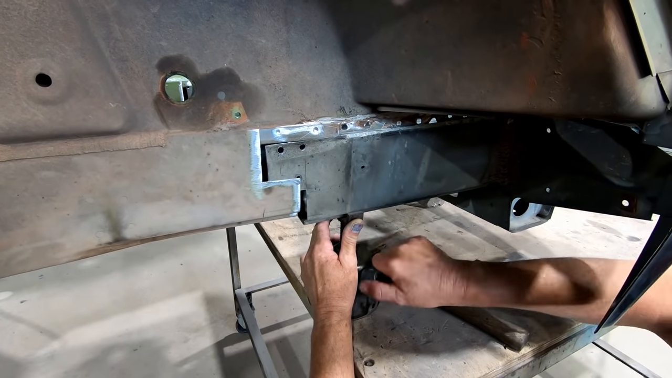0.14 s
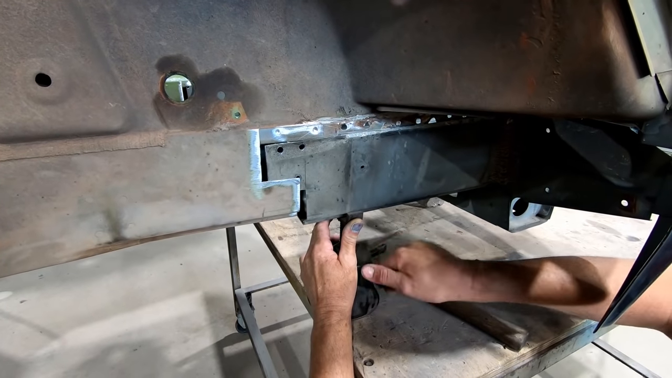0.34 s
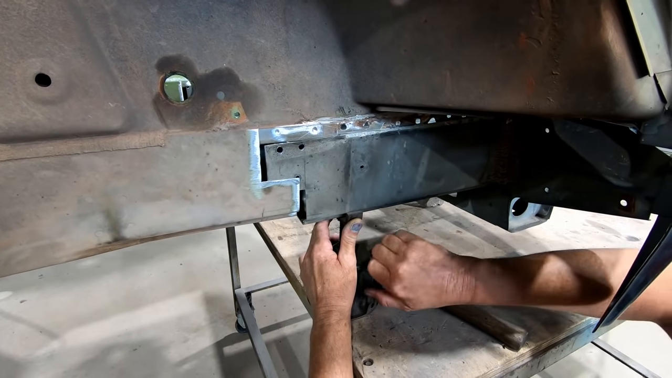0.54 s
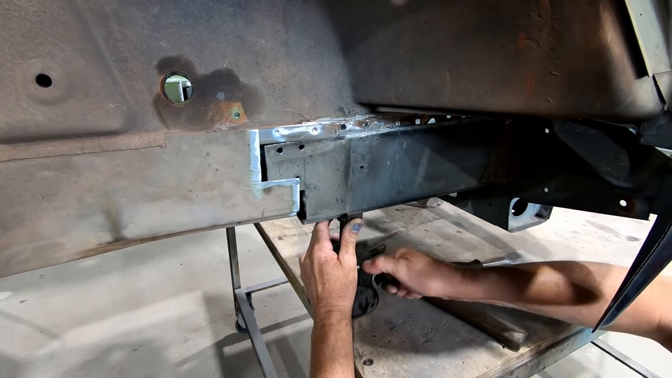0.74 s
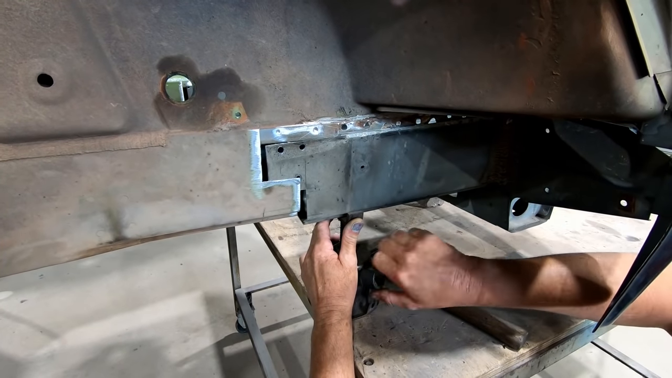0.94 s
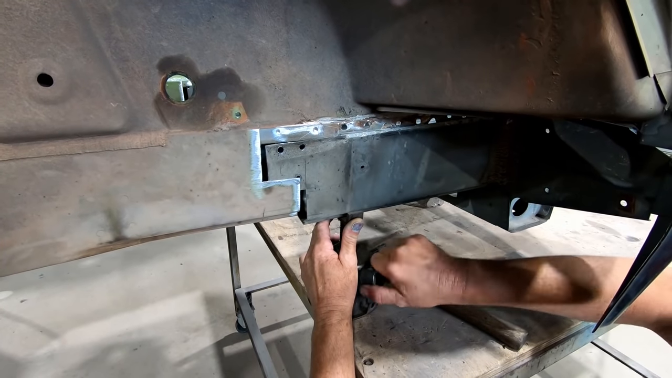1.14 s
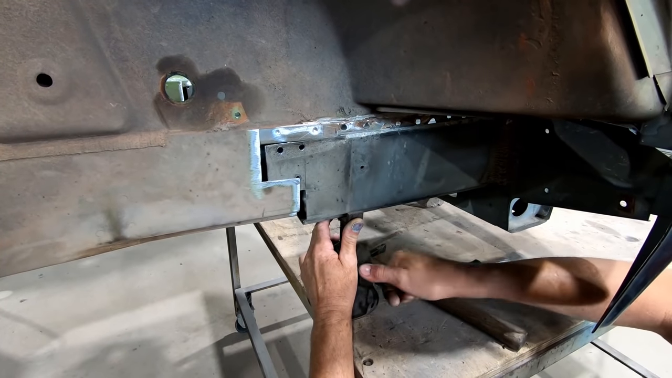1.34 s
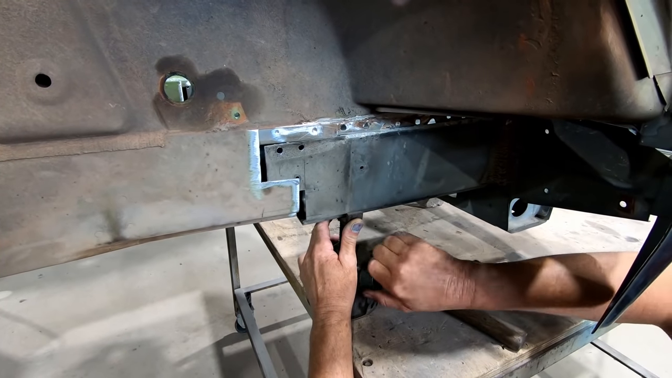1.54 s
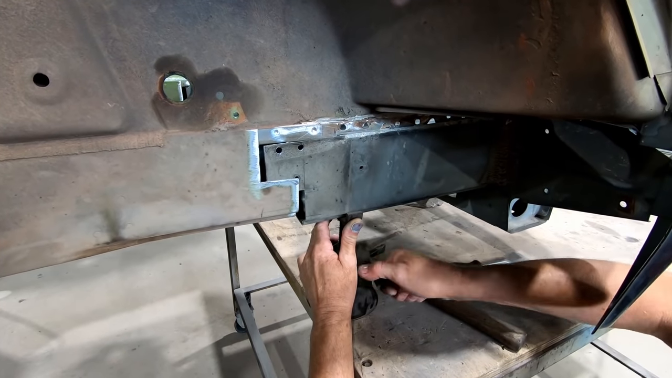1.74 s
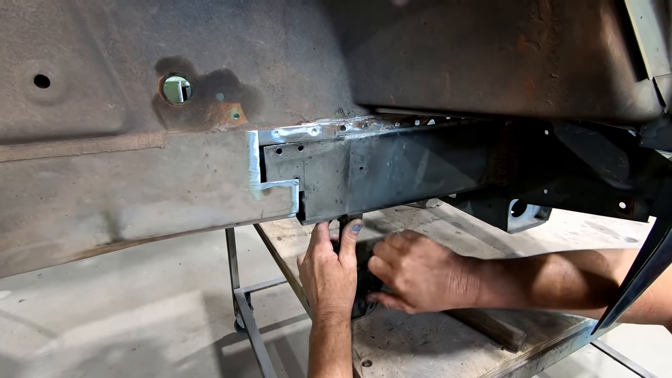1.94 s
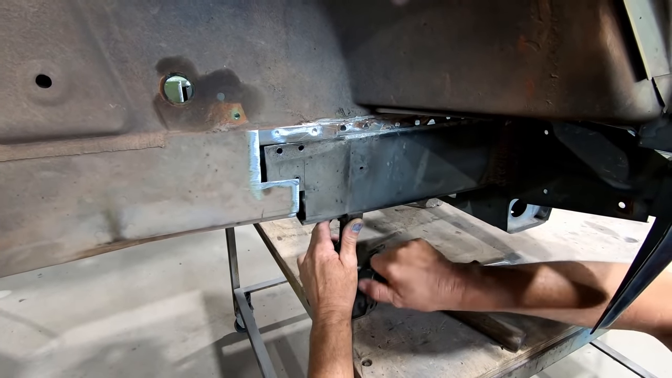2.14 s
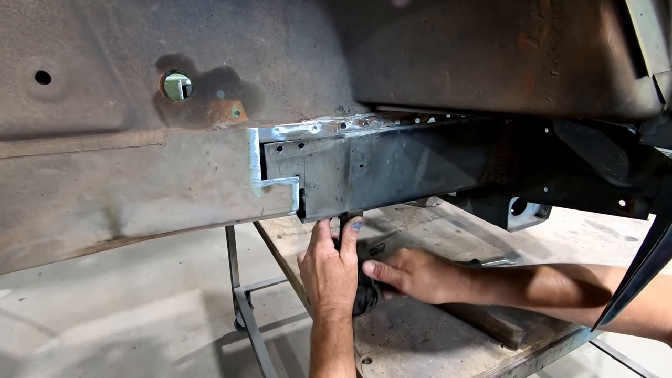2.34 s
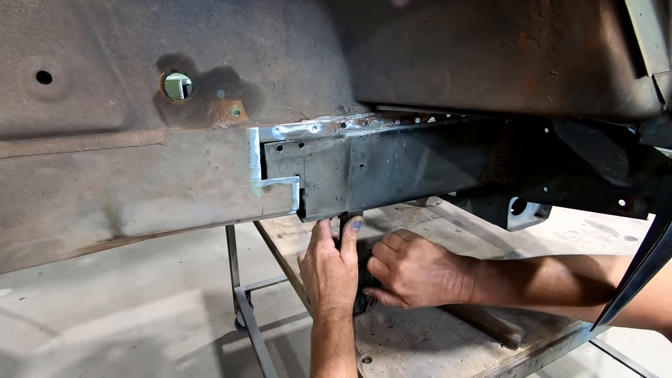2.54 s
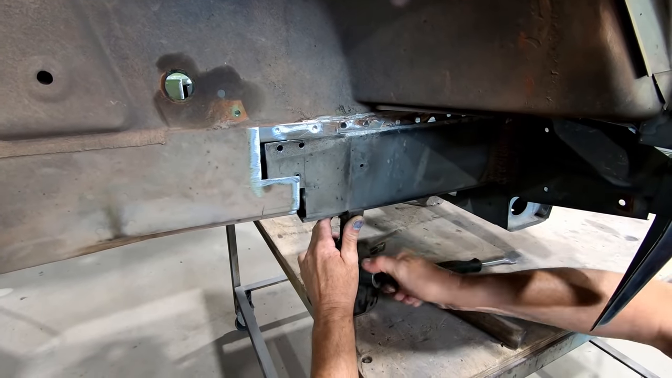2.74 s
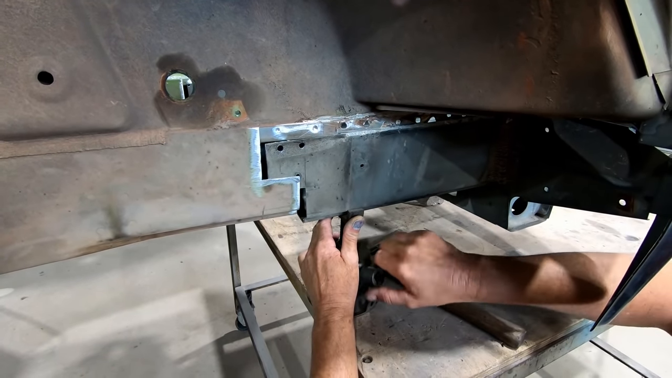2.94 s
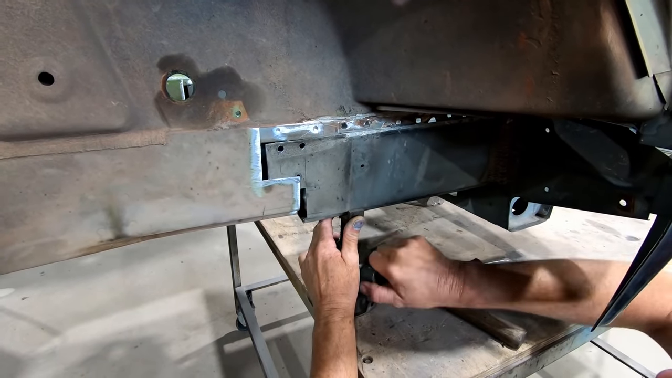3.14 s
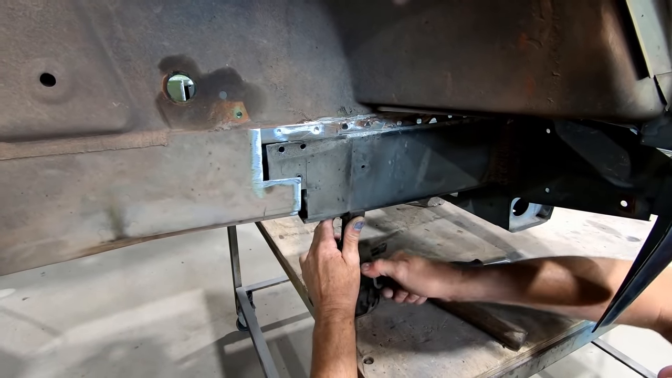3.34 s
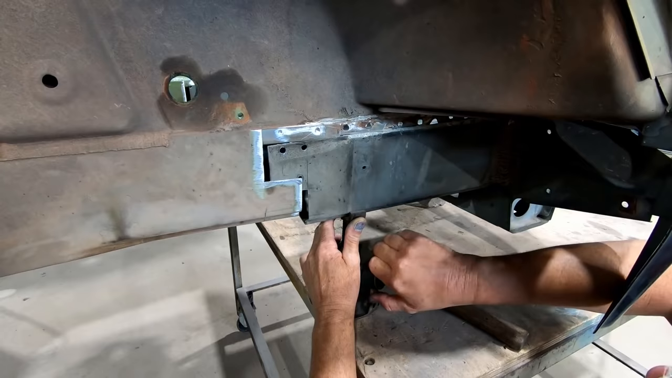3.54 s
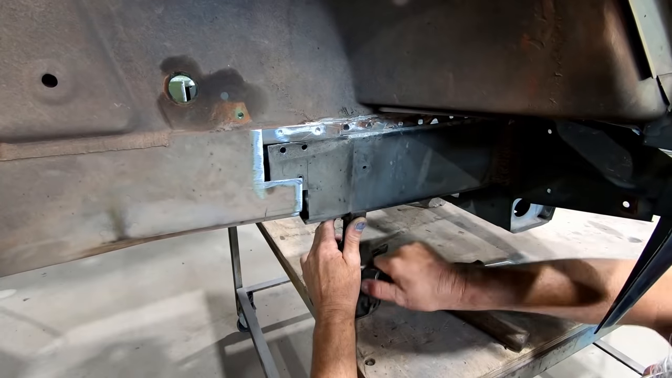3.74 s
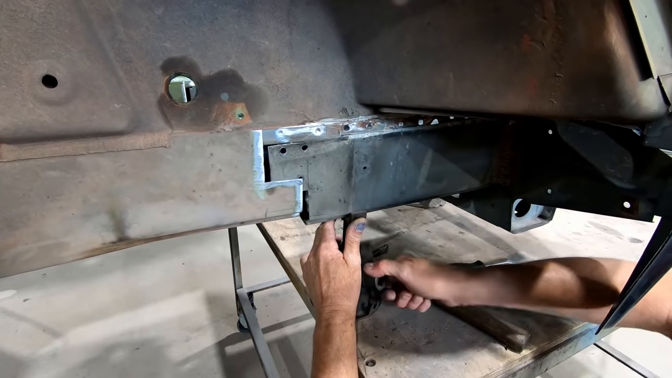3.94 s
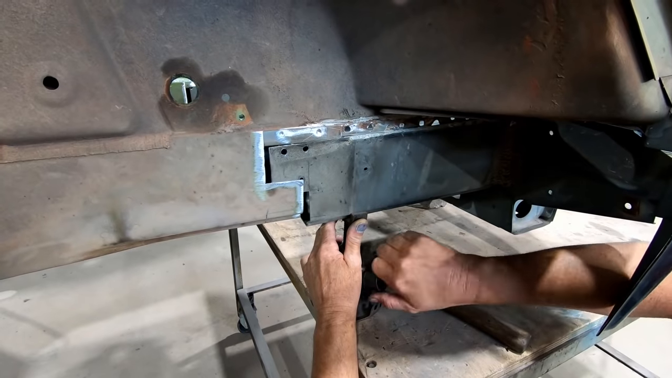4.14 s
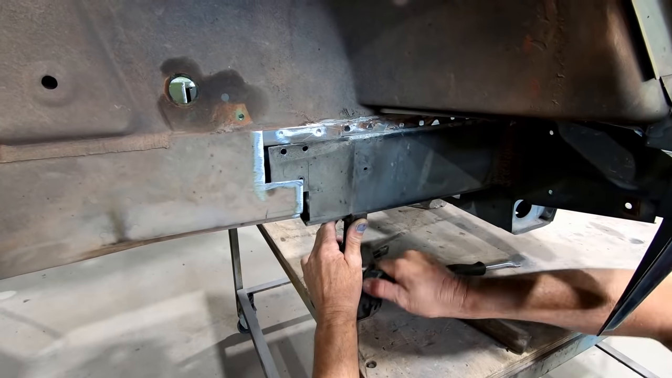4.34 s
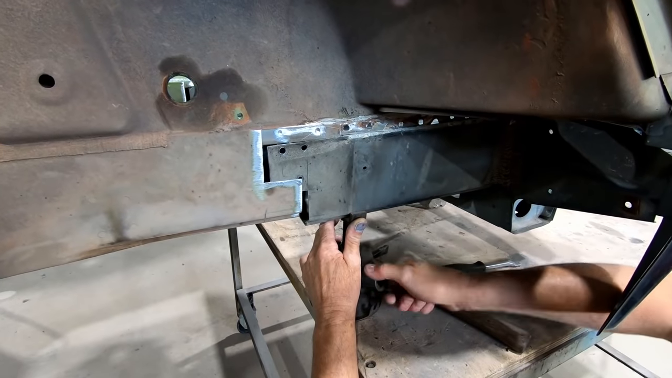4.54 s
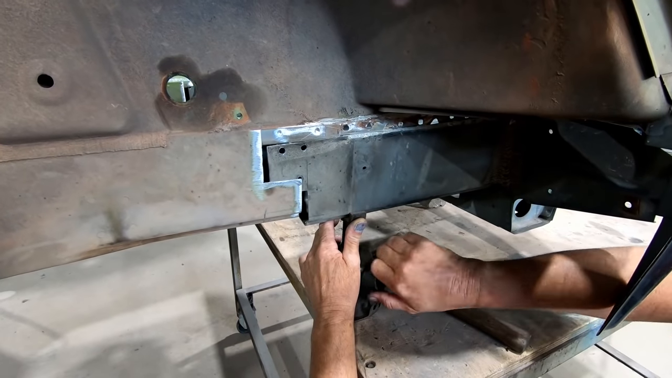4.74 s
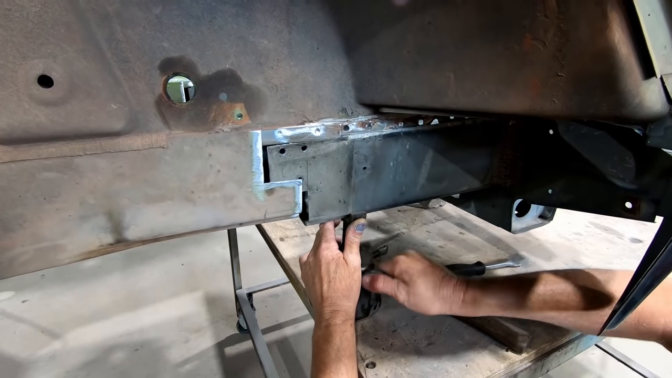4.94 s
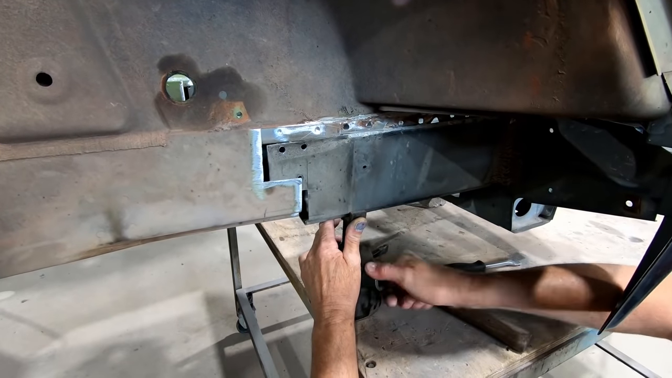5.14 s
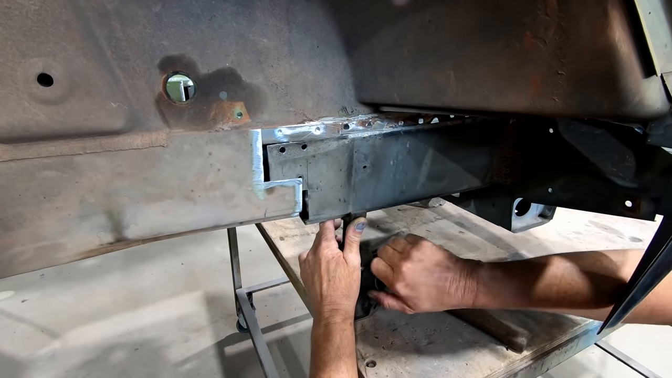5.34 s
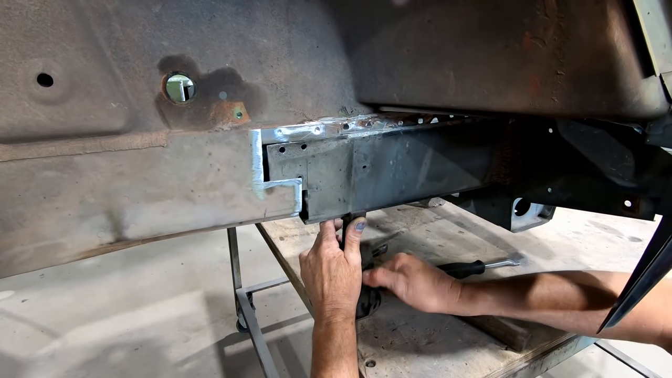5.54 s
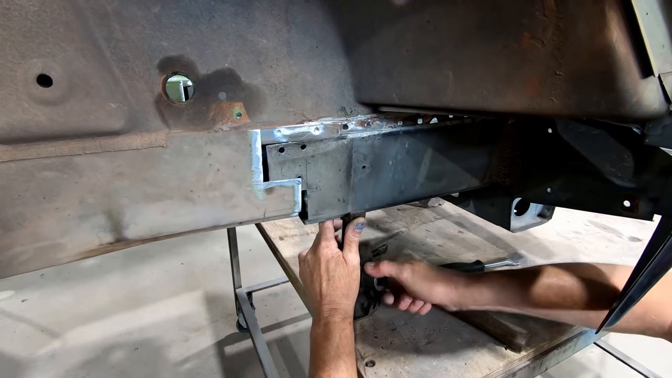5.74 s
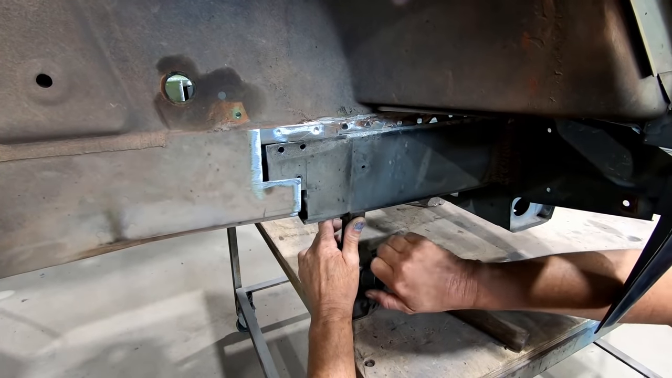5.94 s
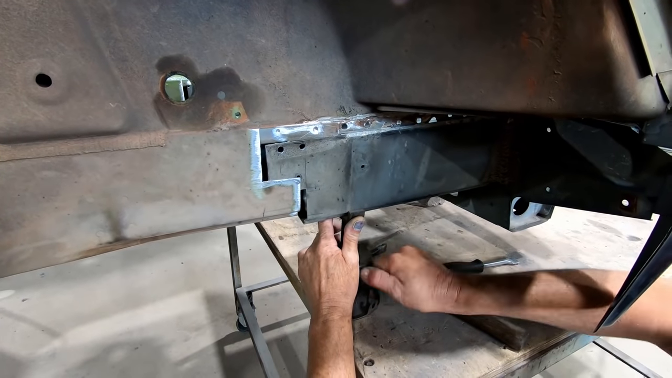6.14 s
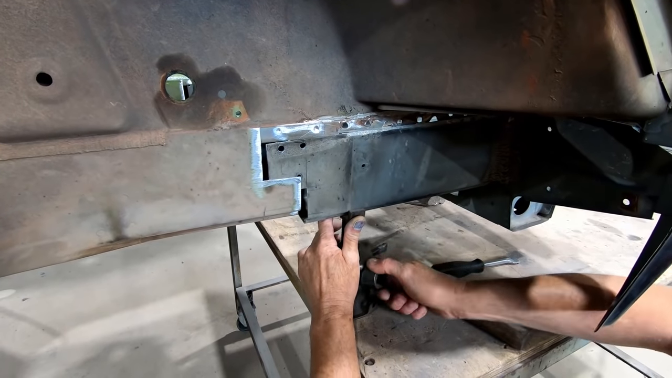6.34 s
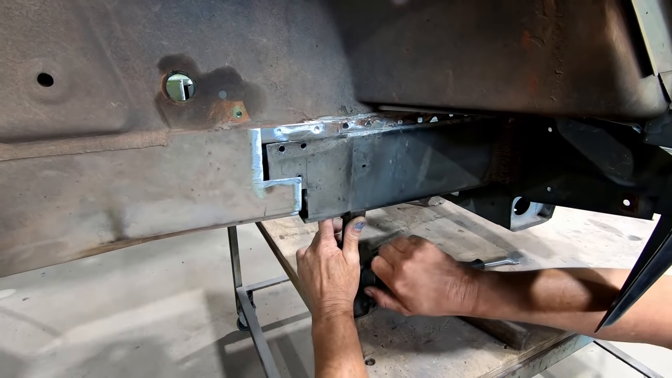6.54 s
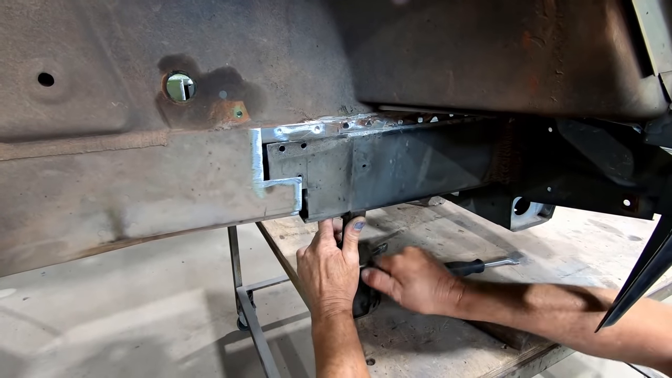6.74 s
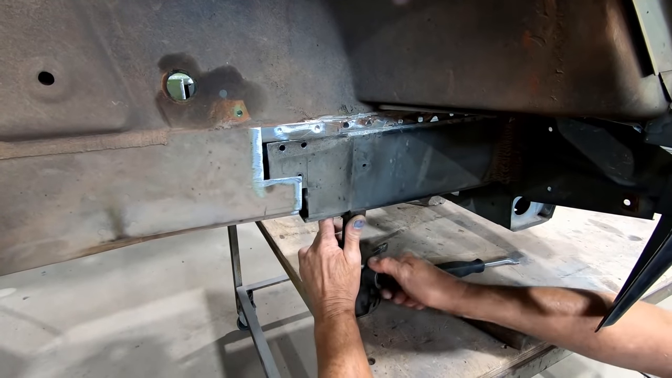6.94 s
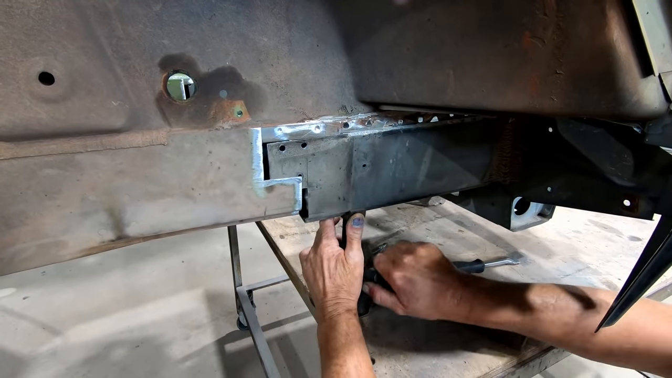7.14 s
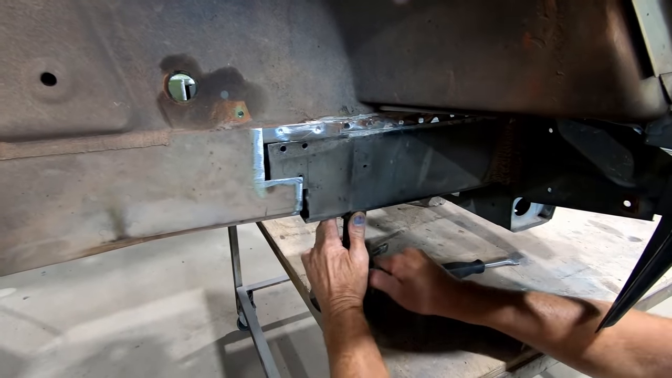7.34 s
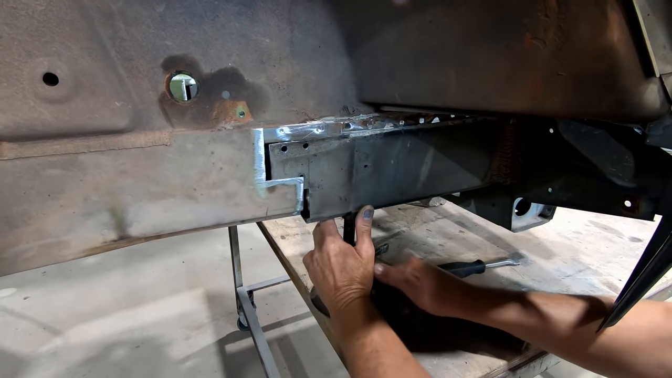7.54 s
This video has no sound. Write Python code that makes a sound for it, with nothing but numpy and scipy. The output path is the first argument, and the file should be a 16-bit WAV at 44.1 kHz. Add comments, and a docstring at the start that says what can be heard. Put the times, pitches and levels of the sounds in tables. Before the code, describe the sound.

In a workshop with diffuse, hollow echo and faint steady air, a screw jack is wound by hand under a bare car body. It opens with a faint dry rub and a light tick at 0.1 s, then a rasp and a run of loose steel clacks from 0.25 s. Clusters of two to four clacks return about every half second until 3.3 s, each with a gritty thread swell; thin faint squeaks appear around 0.8-1.7 s, and soft low bumps at 2.1 and 3.2 s. From about 4 s the rhythm is less even, the rub grittier, with hollow groaning clunks at 4.0, 4.7, 5.3, 5.9 and 6.5 s. At 7.02 s a hard, far louder knock strikes the rail in several rapid contacts, ringing and rattling the sheet steel for about half a second. A stronger rasp, skin sliding on steel and a final clunk come at 7.5 s. Close microphone, thin deep bass.

```python
"""First a faint dry rub of screw thread and a light handle tick, then a rasp and a run of loose steel clacks:
a screw jack is wound by hand under the chassis rail of a bare car body in a workshop.
Filtered noise makes the rasps and clacks, gliding tones the groans of the slack drive, thin tones the squeaks.
Near the end the jack knocks hard on the rail: struck modes ring the rail and the sheet-steel shell.
A diffuse echo and steady air lie behind; the microphone is thin in the deep bass."""
import sys
import numpy as np
from scipy import signal
from scipy.fft import rfft, irfft, next_fast_len
from scipy.io import wavfile
from scipy.ndimage import uniform_filter1d

SR = 44100
rng = np.random.default_rng(int(sys.argv[2]) if len(sys.argv) > 2 else 0)


def store_pcm(level_fs):
    """Save levels as 16-bit WAV."""
    pcm = np.round(np.clip(level_fs, -1, 1) * 32767).astype(np.int16)
    wavfile.write(sys.argv[1], SR, np.atleast_2d(pcm).T)


N = 334390
TIME = np.arange(N) / SR  # seconds

# Levels in the event tables come before the trim_db settings of the functions that use them.
# clacks of the loose drive: start_s, level_db, low_registers_db, top_register_db (last two relative)
CLACKS = [(0.2483, -41, 0, -12), (0.2896, -37.5, -10, -7.5), (0.337, -38, -5.5, -18.5),
          (0.7445, -32, -5.5, -10.5), (0.7843, -32.5, -3.5, -11), (0.835, -36, -11.5, -10.5),
          (1.2523, -36, -1, -18), (1.297, -32.5, -6, -11), (1.3379, -31.5, -7.5, -11.5),
          (1.665, -35.5, -1, -6.5), (1.7567, -30, -2, -12), (1.7908, -28, -5.5, -12.5),
          (1.8345, -32.5, -3.5, -15), (2.24, -34.5, -0.5, -11), (2.2817, -27, -6.5, -13.5),
          (2.3241, -30.5, -6.5, -14), (2.6464, -37.5, 1, -19), (2.7442, -41, 7, -19),
          (2.7863, -29, -7, -22), (2.819, -29.5, -5.5, -15), (3.2835, -34, -3, -13),
          (3.3288, -32, -5, -7.5), (3.7981, -42, 3.5, -7), (3.8638, -34.5, -1, -7.5),
          (3.9097, -35, -0.5, -16), (4.0282, -48.5, 10, -0.5), (4.3095, -42, 1.5, -15),
          (4.3902, -46.5, 7.5, -10), (4.4554, -39.5, 4, -8), (4.5034, -35.5, 3, -17),
          (4.7125, -47, 8.5, -31), (4.9291, -31.5, 1.5, -13.5), (4.9918, -40.5, 3.5, -11),
          (5.0399, -30.5, -10.5, -14), (5.0888, -28.5, -6.5, -13.5), (5.2912, -50.5, 13, -19),
          (5.4842, -52, 7.5, -20), (5.5742, -41.5, -1, -5.5), (5.6435, -29.5, -7, -12.5),
          (5.6945, -40, -0.5, -14), (5.8998, -52.5, 9.5, -16), (6.114, -43.5, 7, -19),
          (6.2162, -35.5, -1.5, -13), (6.2809, -40.5, 3, -3.5), (6.5091, -37.5, 3, -12),
          (6.7072, -34.5, 0.5, -12), (6.8569, -36.5, -7, -10), (6.9164, -38.5, -8, -3),
          (7.2617, -40, 8, -24), (7.5327, -47.5, 12.5, -13)]
# the four registers of a clack: low_hz, high_hz, chatter_s, t60_s, relative_db
REGISTERS = [(214, 475, 0.027, 0.14, -5.5), (527, 1130, 0.012, 0.13, 2.5), (1230, 2420, 0.0037, 0.1, -1.5),
             (2950, 8900, 0.0017, 0.04, 1)]
# resonances of the jack, shifting as the screw extends: pitch_hz, width_hz, lowered_db, raised_db
JACK_MODES = [(233, 11, -5.5, 5), (302, 52, 3, 2), (455, 34, 11.5, 9.5), (710.7, 42, 6.5, 10),
              (795, 73, 4, 2.5), (1040, 820, -1, -6), (1202, 33, -6, 2), (1610, 94, 3, 3),
              (1930, 230, 1.5, 3.5), (2520, 180, 5.5, 3.5), (2840, 47, 11, 8.5)]
# broad tone of the jack's steel: pitch_hz, level_db
JACK_COLOUR = [(100, -6.5), (240, 5.5), (450, 4), (800, 9), (1400, -10), (2200, -19), (3300, -27),
               (5800, -34), (8000, -49.5), (15000, -50)]
# the screw starts and ends coming out of its housing: two times_s
RAISE_S = [2.7, 4.2]

# turns of the screw, full twists and light nudges: fastest_s, speed_up_s, level_db
TURNS = [(0.12, 0.025, -69.5), (0.28, 0.077, -46), (0.772, 0.049, -46), (1.305, 0.092, -46.5),
         (1.78, 0.048, -46), (2.27, 0.068, -48.5), (2.65, 0.051, -57), (2.8, 0.066, -45),
         (3.301, 0.058, -43.5), (3.7, 0.039, -64), (3.87, 0.077, -49.5), (4.034, .015, -54),
         (4.3, 0.0087, -51.5), (4.46, 0.096, -51), (4.69, 0.099, -62), (5.07, 0.062, -46.5),
         (5.28, 0.046, -66), (5.5, 0.044, -58), (5.64, 0.079, -49), (6.1, 0.035, -59.5), (6.27, 0.12, -50),
         (6.71, 0.074, -52), (6.9, 0.067, -47.5), (7.05, 0.1, -51.5), (7.27, 0.12, -46.5),
         (7.495, 0.066, -38.5)]
# rub of the thread between turns, screw lowered and screw raised: two levels_db
CREEP_DB = [-66, -60.5]
# broad tone of the rubbing thread: pitch_hz, level_db
RUB_COLOUR = [(200, 12), (700, 17), (1500, 4), (3000, -0.5), (5500, -2.5), (7800, -9), (10000, -16.5),
              (15000, -25.5)]
# ring of the screw under the rubbing thread: pitch_hz, width_hz, level_db
SCREW_MODES = [(4120, 170, 3), (4760, 220, 1.5), (5930, 470, 1), (6920, 170, 3.5), (8000, 290, 3)]
# the drive flops through its slack: start_s, groan_db, panel_db
FLOPS = [(4.027, -38.5, -36.5), (4.078, -40, -40.5), (4.715, -37, -43.5), (5.291, -30, -34),
         (5.9, -33.5, -33.5), (6.511, -29.5, -31), (6.708, -50, -33.5), (7.532, -24.5, -34.5)]

# contacts of the hard knock: start_s, level_db
KNOCK_CONTACTS = [(7.0197, -1.5), (7.0212, 0.5), (7.0228, 5.5), (7.026, -0.5), (7.0334, -3.5), (7.0352, 3),
                  (7.0650, -15)]
# the rail where the jack strikes it: pitch_hz, level_db, t60_s
RAIL_MODES = [(270, -23, 0.075), (494, -7.5, 0.033), (740, 3, 0.015), (855, -20, 0.0035),
              (1282, -9.5, 0.023), (1940, -30, 0.049)]
# panels of the body shell: pitch_hz, level_db, t60_s
SHELL_MODES = [(140, 4, 0.47), (240.6, 4.5, 0.51), (290, -3.5, 0.82), (312, 7, 0.44), (328, -8, .5),
               (382, -19, 0.42), (425, 5, 0.59), (444, 0.5, 0.45), (472, 0.5, 0.54), (522, 10.5, 0.17),
               (527, 1, .5), (594, -7, 1), (680, 5, 0.45), (750, 5, 0.17), (902, -6.5, 1),
               (1270, -16, 0.54)]
# tone of the noisy crack at the first contact: pitch_hz, level_db
CRACK_COLOUR = [(60, -18), (300, 20), (2000, 15), (4000, 1), (7000, -9.5), (15000, -39)]
# tone of the panel rattle: pitch_hz, level_db
RATTLE_COLOUR = [(100, -13), (350, -15), (750, 1.5), (1450, -1.5), (1900, -19), (3000, -16), (8000, -60)]

# soft bumps: start_s, pitch_hz, level_db, t60_s
BUMPS = [(1.178, 292, -47, 0.074), (2.065, 83.6, -26.5, 0.066), (2.111, 89, -37, 0.076),
         (2.969, 65.4, -41, 0.086), (3.02, 137, -58, 0.12), (3.232, 80, -26.5, 0.03),
         (4.506, 96, -36, 0.36), (7.023, 69, -46, 0.24), (7.529, 131, -29.5, 0.096)]
# light bright ticks of the handle: start_s, pitch_hz, level_db
TICKS = [(.102, 4530, -58), (2.877, 5900, -49), (3.192, 5000, -57), (6.283, 10400, -49.5)]
# a hand slides over the steel: time_s, level_db
SLIDE = [(7.38, -68), (7.45, -65), (7.5, -55), (7.53, -68), (7.58, -66)]
# faint thin squeaks: start_s, length_s, start_hz, end_hz, level_db
SQUEAKS = [(0.79, 0.26, 6700, 6670, -62.5), (0.924, 0.22, 5400, 5350, -72), (1.303, 0.34, 6760, 7200, -63),
           (1.486, 0.24, 5340, 5000, -65.5)]
# bands of the workshop echo: low_hz, high_hz, t60_s, level_db
ROOM_BANDS = [(70, 413, 1.39, -1), (355, 1100, 0.64, -7), (910, 2640, 1.03, -9), (2680, 10000, 0.73, -10.5)]
# spectrum of the steady background: pitch_hz, level_db
AIR_COLOUR = [(15, -46), (25, -11), (101, 6.5), (378, -7.5), (495, -4.5), (848, -18), (1410, -13.5),
              (2560, -23.5), (3170, -20), (3440, -19), (4150, -21), (6550, -22), (15500, -22.5)]


def undb(db):
    """Decibels to gain."""
    return 10 ** (np.asarray(db) / 20)


def unit(x):
    """Scale to rms 1."""
    return x / np.sqrt(np.mean(x ** 2))


def band(x, low_hz, high_hz, order=3):
    """Causal Butterworth band-pass."""
    edges = [low_hz, min(high_hz, SR / 2 - 1000)]
    return signal.sosfilt(signal.butter(order, edges, "band", fs=SR, output="sos"), x)


def colour(x, points, peaks=()):
    """Minimum-phase filter through (pitch_hz, level_db) points, with resonances on top."""
    size = next_fast_len(len(x) + 2048, real=True) // 2 * 2
    f = np.arange(size // 2 + 1) * SR / size + 1  # 1 Hz offset keeps the logarithm finite
    hz, db = np.transpose(points)
    level_db = np.interp(np.log(f), np.log(hz), db)
    for centre, width, peak_db in peaks:
        level_db = level_db + peak_db / (1 + (2 * (f - centre) / width) ** 2)
    # folding the cepstrum forward in time makes the filter causal
    cepstrum = irfft(np.log(undb(level_db)))
    cepstrum[1:size // 2] *= 2
    cepstrum[size // 2 + 1:] = 0
    return irfft(rfft(x, size) * np.exp(rfft(cepstrum)))[:len(x)]


def decay(t, t60):
    """Exponential decay that falls 60 dB in t60 seconds."""
    return np.exp(-np.log(1000) * t / t60)


def fade(t60):
    """One second of exponential decay."""
    return decay(TIME[:SR], t60)


def ring(modes):
    """One second of struck modes: decaying sines."""
    return sum(undb(db) * fade(t60) * np.sin(2 * np.pi * hz * TIME[:SR]) for hz, db, t60 in modes)


def add(out, start_s, x):
    """Mix x in at a time."""
    i = max(int(start_s * SR), 0)
    out[i:i + len(x)] += x[:max(N - i, 0)]


def walk(rate_hz):
    """Random line through rate_hz normal draws a second, spread near 1."""
    steps = rng.standard_normal(16384)
    return np.interp(TIME * rate_hz, np.arange(len(steps)), steps)


def raised(at_s):
    """How far the screw stands out of its housing, 0-1."""
    return np.interp(at_s, RAISE_S, [0, 1])


def clacks(trim_db=-3, strike=8, grain_db=2.5, grain_hz=900):
    """Loose steel meets sharply, chatters in many small contacts, then dies away, the treble first."""
    out, t = np.zeros(N), TIME[:SR // 4]
    for start_s, level_db, low_db, top_db in CLACKS:
        grain = np.interp(t * grain_hz, np.arange(512), rng.standard_normal(512))
        chatter = rng.standard_normal(len(t)) * unit(undb(grain_db * grain))
        chatter[0] = strike
        lift = raised(start_s)
        peaks = [(hz, width, low + lift * (high - low)) for hz, width, low, high in JACK_MODES]
        for (low_hz, high_hz, hold_s, t60, register_db), relative_db in zip(
                REGISTERS, (low_db, low_db, 0, top_db)):
            shape = decay(np.maximum(t - hold_s, 0), t60)
            part = band(colour(chatter * shape, JACK_COLOUR, peaks), low_hz, high_hz)
            peak = np.sqrt(uniform_filter1d(part ** 2, size=256).max())  # loudest short-term rms
            add(out, start_s, part / peak * undb(level_db + relative_db + register_db + trim_db))
    return out


def turning(shape=2.33, coast=1):
    """Strength of the rub: each turn speeds up and coasts to rest, over a faint creep of the thread."""
    # shape: 1 is a pointed swell, 2 a round one; coast: slow-down time over speed-up time
    power = undb(np.interp(TIME, RAISE_S, CREEP_DB)) ** 2
    for fastest_s, speed_up_s, level_db in TURNS:
        away = np.maximum(fastest_s - TIME, (TIME - fastest_s) / coast) / speed_up_s
        swell = np.exp(-np.minimum(away, 10) ** shape)
        power = power + (undb(level_db) * swell) ** 2
    return np.sqrt(power)


def thread(trim_db=-1, grit_db=1.5, patch_db=2):
    """Dry thread: dense tiny slips, coming in uneven patches, ring the screw."""
    slips = rng.standard_normal(N) * undb(grit_db * walk(450) + patch_db * walk(50))
    return unit(colour(slips, RUB_COLOUR, SCREW_MODES)) * turning() * undb(trim_db)


def glide(first_hz, last_hz, settle_s):
    """One-second sine whose pitch settles exponentially."""
    hz = last_hz + (first_hz - last_hz) * np.exp(-TIME[:SR] / settle_s)
    return np.sin(2 * np.pi * np.cumsum(hz) / SR)


def flops(rise_s=0.0096):
    """The thread slips with a rising groan and rings a low panel, whose pitch sags as it settles."""
    out = np.zeros(N)
    groan = glide(265, 490, settle_s=0.039) * fade(0.18)
    panel = glide(285, 232, settle_s=0.021) * fade(0.19)
    onset = 1 - np.exp(-TIME[:SR] / rise_s)
    for start_s, groan_db, panel_db in FLOPS:
        add(out, start_s, (undb(groan_db) * groan + undb(panel_db) * panel) * onset)
    return out


def rail_blows(trim_db=-6, contact_s=0.0009, crack_db=-34, crack_t60=0.15):
    """The jack head slams into the rail and rebounds: short pushes ring its modes, with one noisy crack."""
    out = np.zeros(N)
    push = np.sin(np.pi * np.minimum(TIME[:256] / contact_s, 1)) ** 2
    blow = band(signal.fftconvolve(ring(RAIL_MODES), push / push.sum()), 140, 5000, order=4)
    for start_s, level_db in KNOCK_CONTACTS:
        add(out, start_s, undb(level_db + trim_db) * blow)
    crack = colour(rng.standard_normal(SR) * fade(crack_t60), CRACK_COLOUR)
    add(out, KNOCK_CONTACTS[0][0], undb(crack_db) * crack)
    return out


def shell_panels(trim_db=-30, spread_s=0.0025, rattle_db=-39, rattle_t60=1.0, rough_db=5):
    """The panels take up the first blow of the knock: their modes ring and rough noise rattles."""
    out = np.zeros(N)
    rough = rng.standard_normal(SR) * undb(rough_db * walk(180)[:SR])
    rattle = unit(colour(rough, RATTLE_COLOUR)) * fade(rattle_t60)
    # the blow takes a moment to spread through the shell
    spread = 1 - np.exp(-(TIME[:SR] / spread_s) ** 2)
    panels = undb(trim_db) * ring(SHELL_MODES) + undb(rattle_db) * rattle
    add(out, KNOCK_CONTACTS[0][0], spread * panels)
    return out


def bumps(rise_s=0.0017):
    """Soft low bumps as the weight shifts: single decaying modes with a softened start."""
    out = np.zeros(N)
    onset = 1 - np.exp(-TIME[:SR] / rise_s)
    for start_s, hz, level_db, t60 in BUMPS:
        add(out, start_s, ring([(hz, level_db, t60)]) * onset)
    return out


def handling(tick_t60=0.022):
    """Small ticks of the handle and the hiss of skin on steel, both band-passed noise."""
    hiss = unit(band(rng.standard_normal(N), 3900, 10400, order=2))
    # silent before the first slide point, steady after the last
    out = hiss * undb(np.interp(TIME, *np.transpose(SLIDE), left=-np.inf))
    for start_s, hz, level_db in TICKS:
        tick = unit(band(rng.standard_normal(SR), 0.73 * hz, 1.1 * hz, order=2))
        add(out, start_s, undb(level_db) * tick * fade(tick_t60))
    return out


def squeaks(waver_hz=200, flutter_db=3):
    """Thin whistles, unsteady in pitch and level, that swell and fade."""
    out = np.zeros(N)
    for start_s, length_s, start_hz, end_hz, level_db in SQUEAKS:
        hz = np.interp(TIME, [start_s, start_s + length_s], [start_hz, end_hz]) + waver_hz * walk(1100)
        tone = np.sin(2 * np.pi * np.cumsum(hz) / SR) * undb(flutter_db * walk(25))
        swell = np.sqrt(np.abs(np.hanning(int(length_s * SR))))
        add(out, start_s, undb(level_db) * swell * tone[int(start_s * SR):][:len(swell)])
    return out


def workshop(x, build_s=0.0033):
    """Diffuse echo of the hollow body and the walls around it: decaying noise in four bands."""
    response = 0
    for low_hz, high_hz, t60, level_db in ROOM_BANDS:
        tail = unit(band(rng.standard_normal(SR), low_hz, high_hz))
        tail = tail * np.sqrt(2 * (high_hz - low_hz) / SR)  # wider bands carry more energy
        shape = fade(t60) * (1 - np.exp(-(TIME[:SR] / build_s) ** 2))
        response = response + undb(level_db) * tail * shape / np.linalg.norm(shape)
    return signal.fftconvolve(x, response)[:N]


def air(level_db=-60):
    """Quiet steady background: coloured noise."""
    return unit(colour(rng.standard_normal(N), AIR_COLOUR)) * undb(level_db)


def scene(blow_room_db=-6, rub_room_db=-4, flop_room_db=-4):
    """Jack, shell and workshop echo over the steady background; room levels set what feeds the echo."""
    rattle, groans, rub = clacks(), flops(), thread() + handling()
    blows, panels = rail_blows(), shell_panels()
    to_room = rattle + undb(flop_room_db) * groans + undb(blow_room_db) * blows + undb(rub_room_db) * rub
    direct = rattle + groans + rub + blows + panels + bumps() + squeaks()
    return (direct + workshop(to_room) + air())[None]


def record(dry, low_cut_hz=42, top_hz=15800):
    """The microphone thins the deep bass and the recorder cuts the top."""
    thin = signal.sosfilt(signal.butter(2, low_cut_hz, "high", fs=SR, output="sos"), dry)
    return signal.sosfilt(signal.ellip(10, .2, 70, top_hz, fs=SR, output="sos"), thin)


dry = scene()
out = record(dry)
store_pcm(out)
```